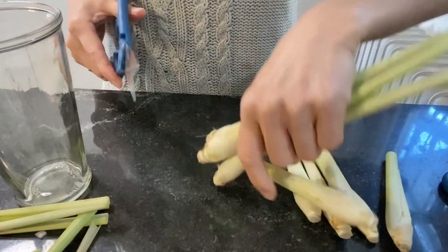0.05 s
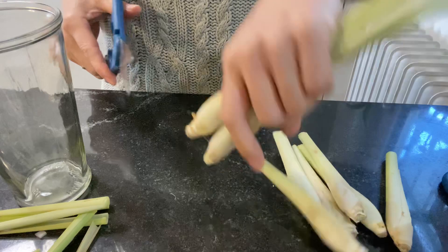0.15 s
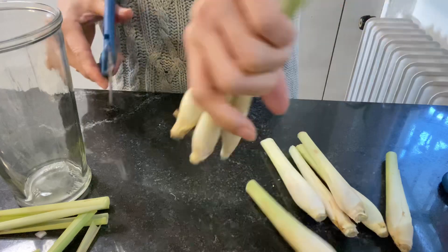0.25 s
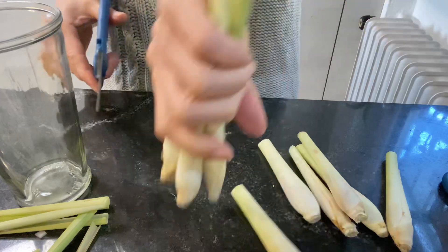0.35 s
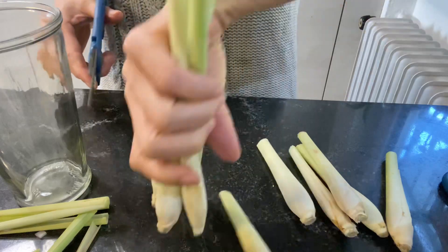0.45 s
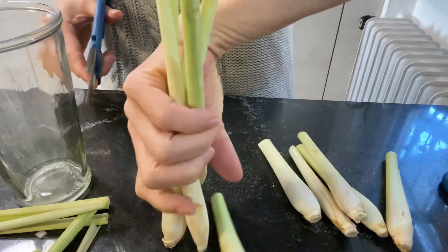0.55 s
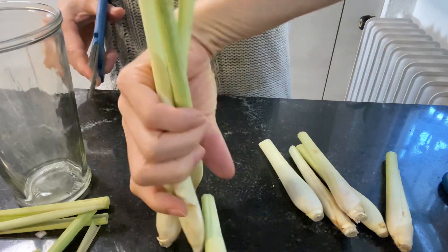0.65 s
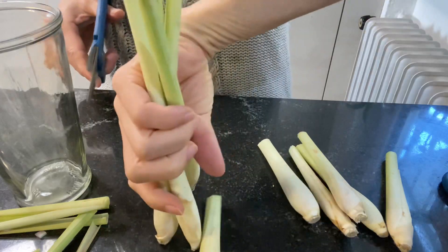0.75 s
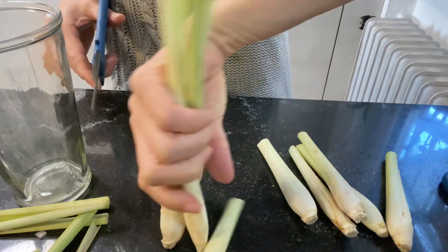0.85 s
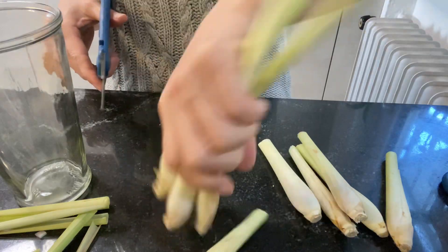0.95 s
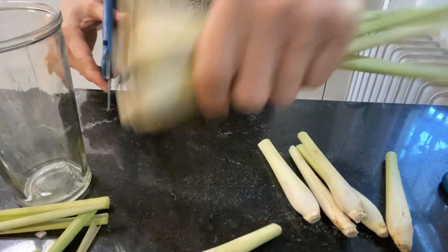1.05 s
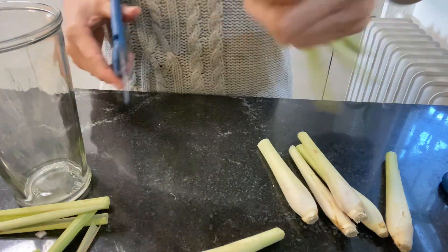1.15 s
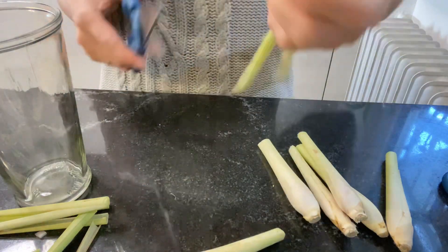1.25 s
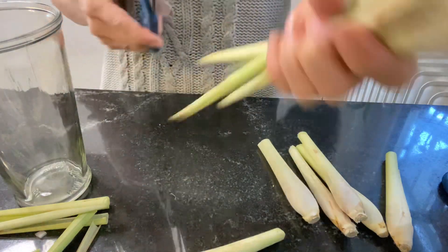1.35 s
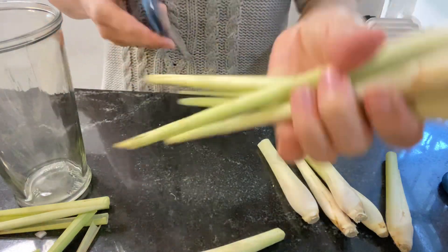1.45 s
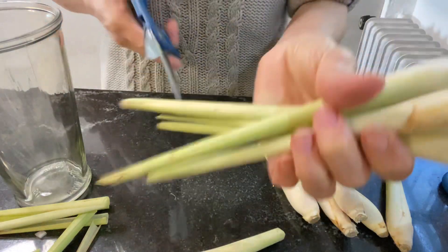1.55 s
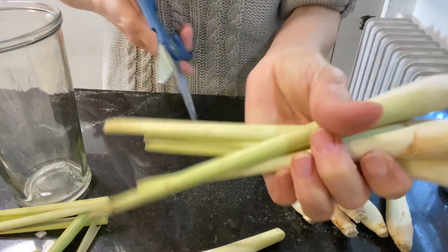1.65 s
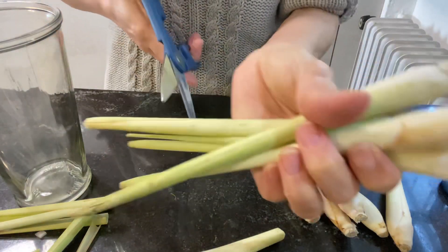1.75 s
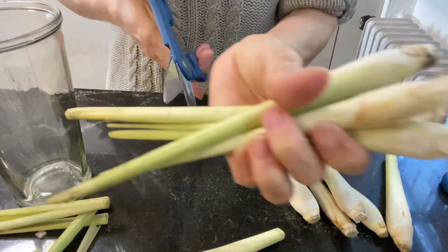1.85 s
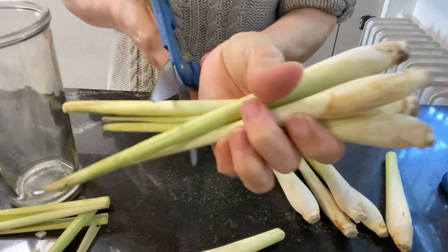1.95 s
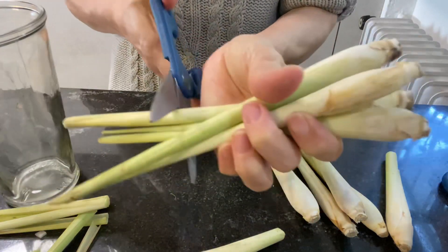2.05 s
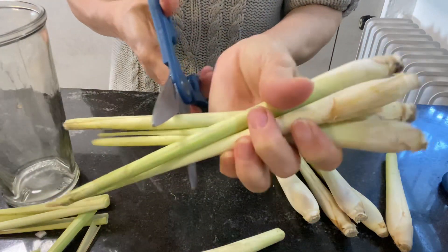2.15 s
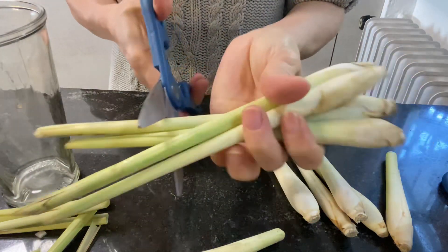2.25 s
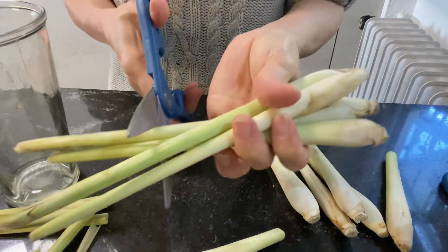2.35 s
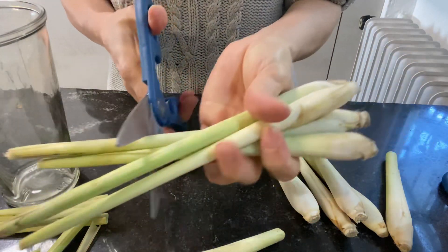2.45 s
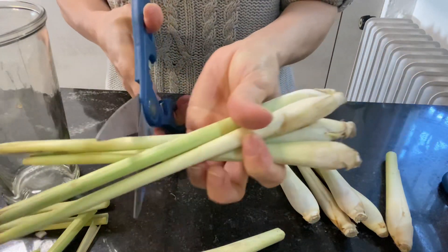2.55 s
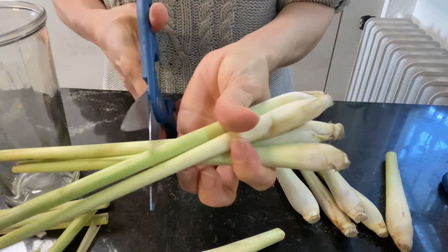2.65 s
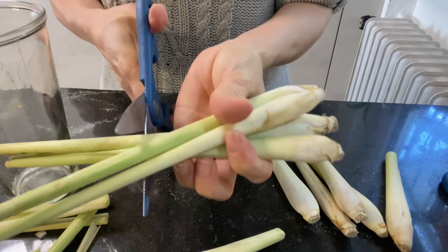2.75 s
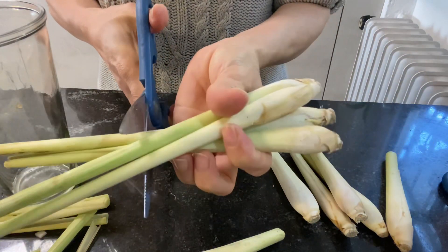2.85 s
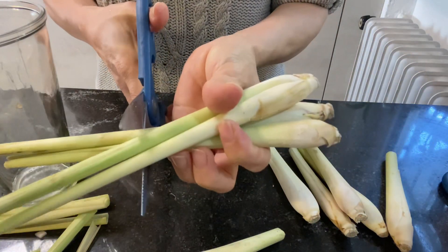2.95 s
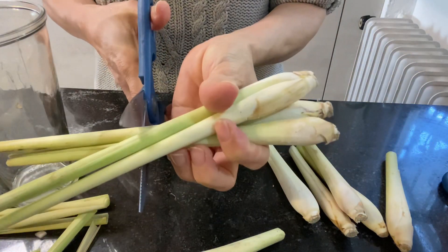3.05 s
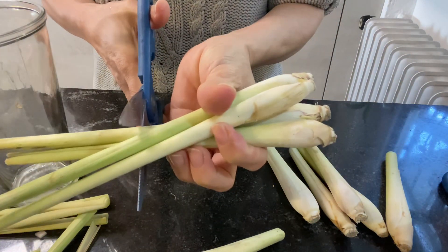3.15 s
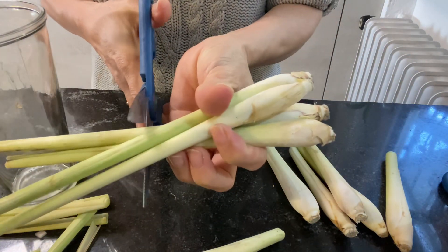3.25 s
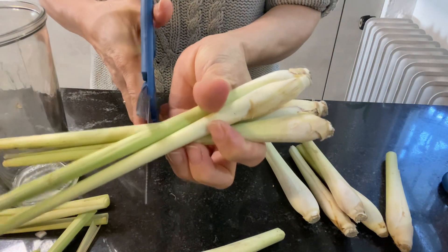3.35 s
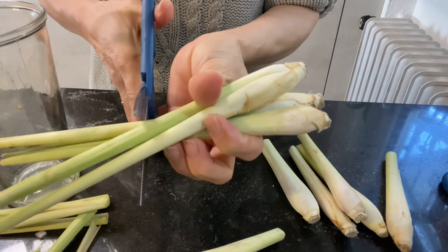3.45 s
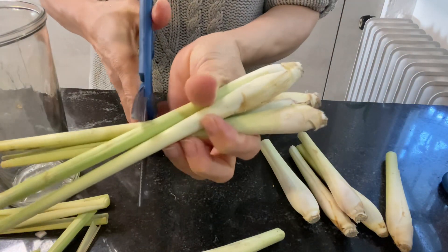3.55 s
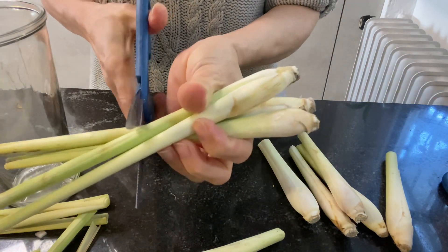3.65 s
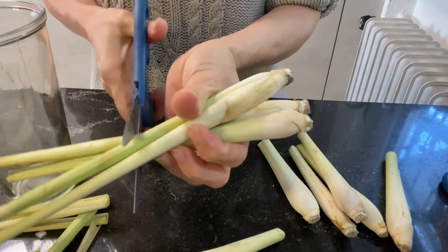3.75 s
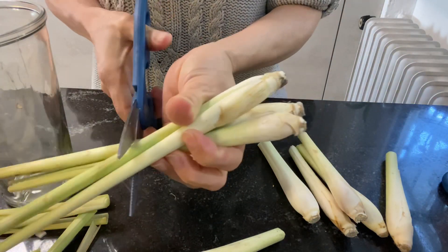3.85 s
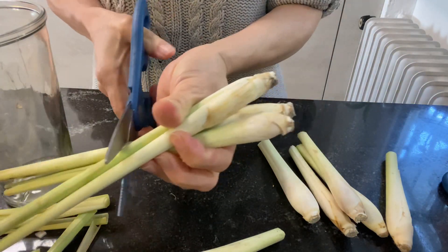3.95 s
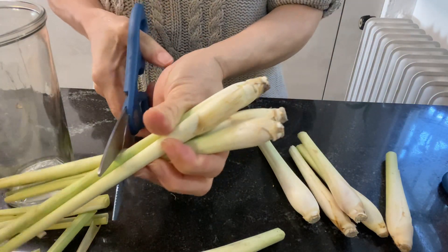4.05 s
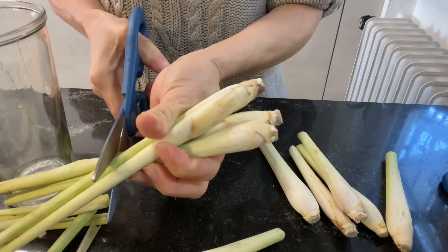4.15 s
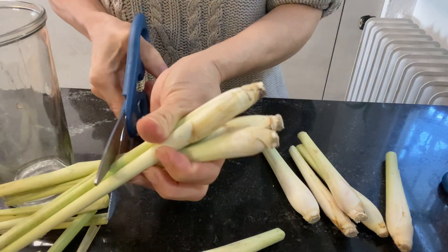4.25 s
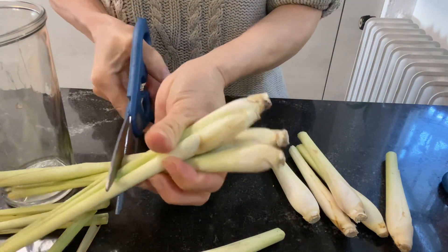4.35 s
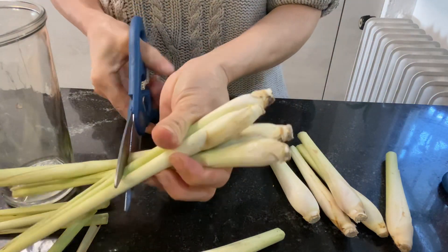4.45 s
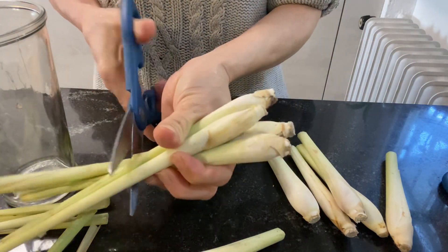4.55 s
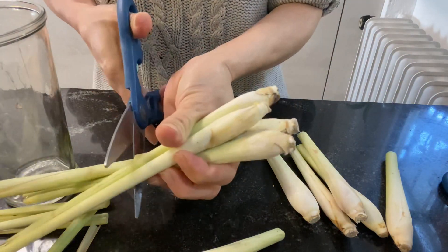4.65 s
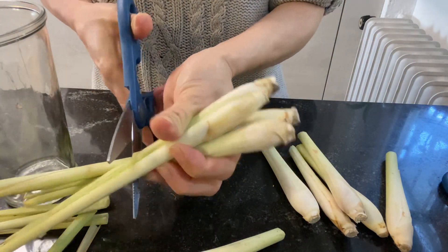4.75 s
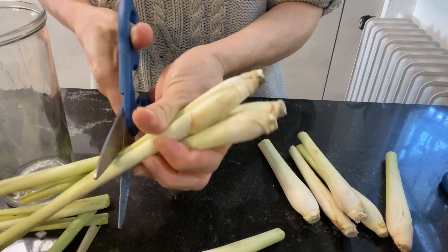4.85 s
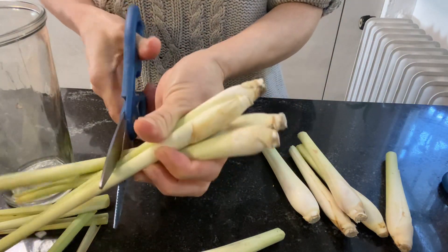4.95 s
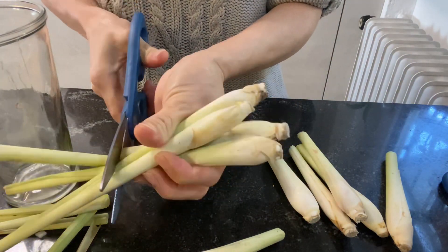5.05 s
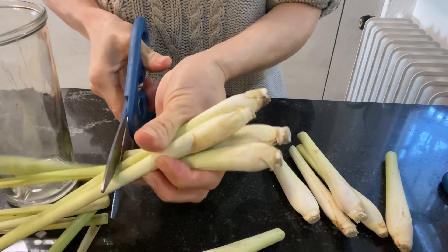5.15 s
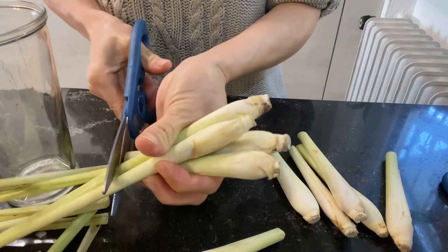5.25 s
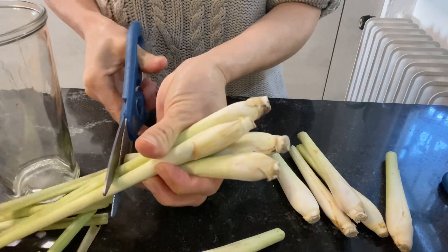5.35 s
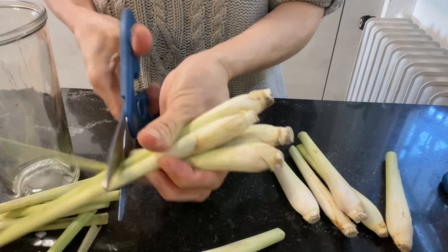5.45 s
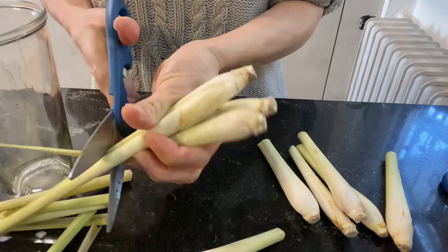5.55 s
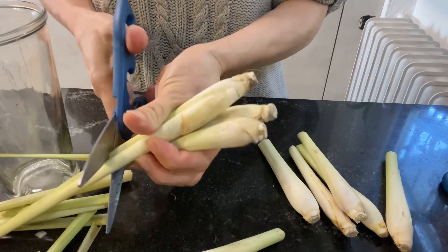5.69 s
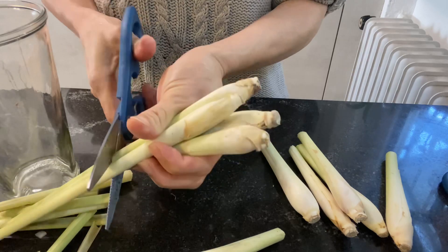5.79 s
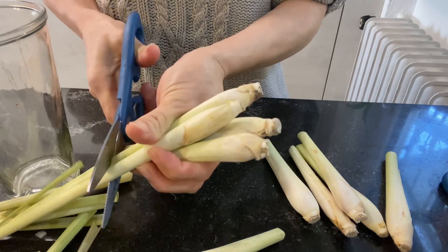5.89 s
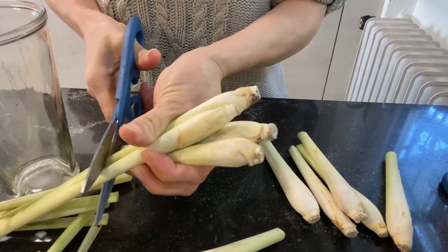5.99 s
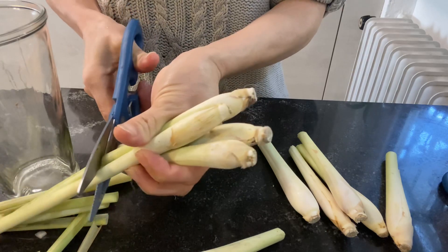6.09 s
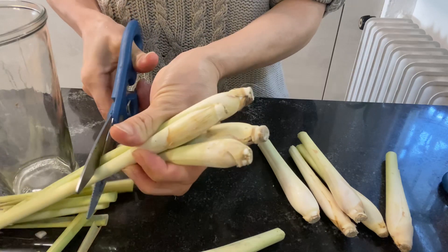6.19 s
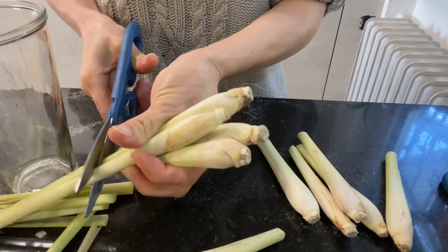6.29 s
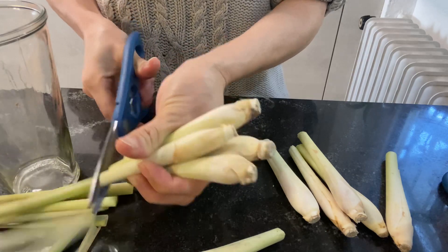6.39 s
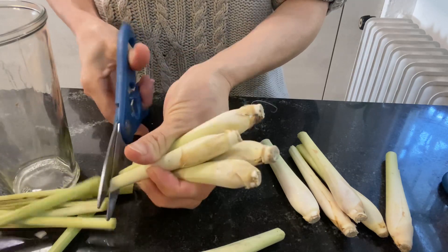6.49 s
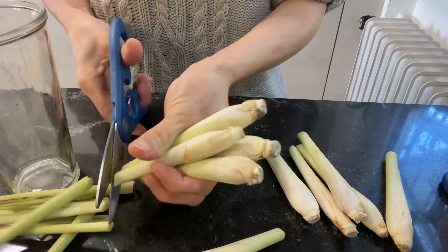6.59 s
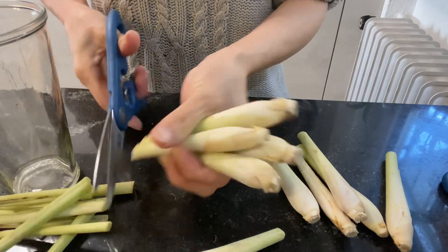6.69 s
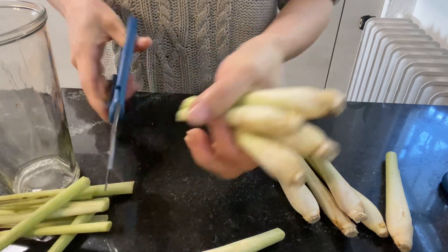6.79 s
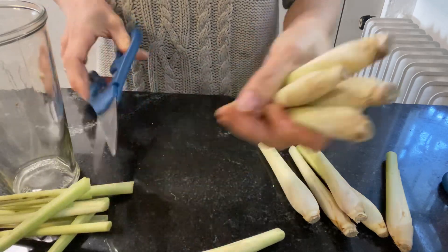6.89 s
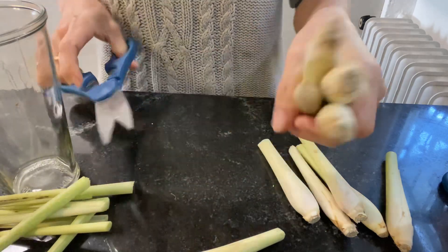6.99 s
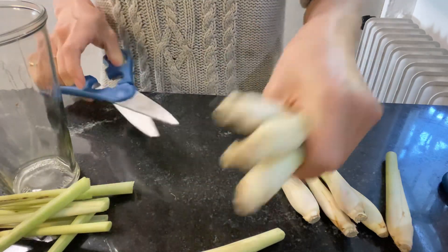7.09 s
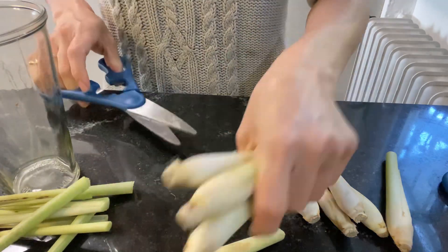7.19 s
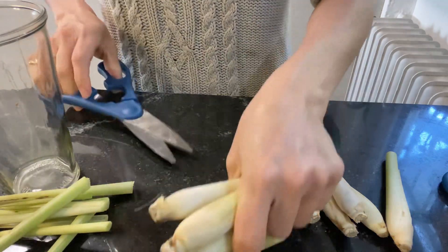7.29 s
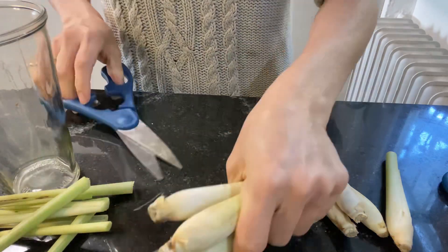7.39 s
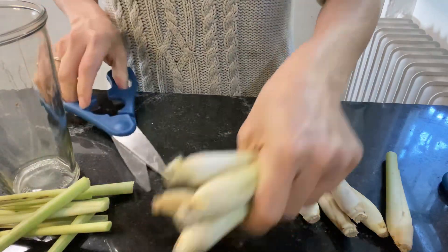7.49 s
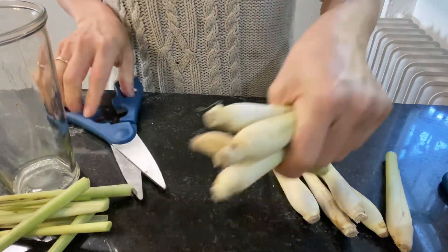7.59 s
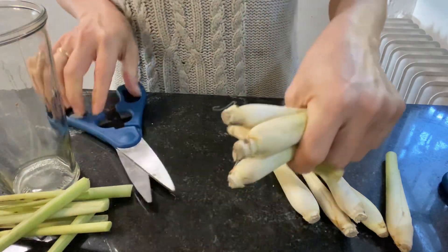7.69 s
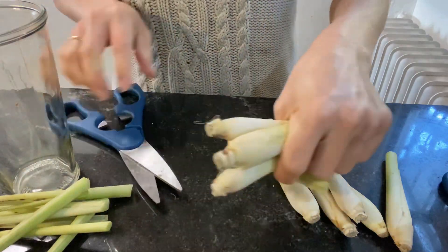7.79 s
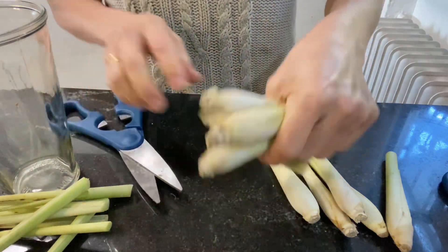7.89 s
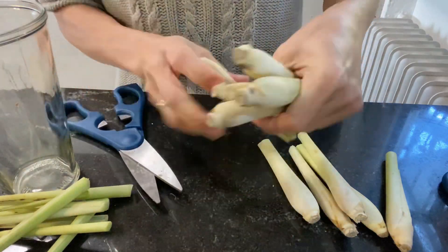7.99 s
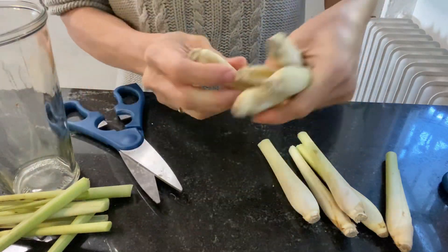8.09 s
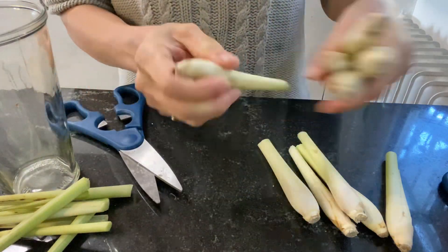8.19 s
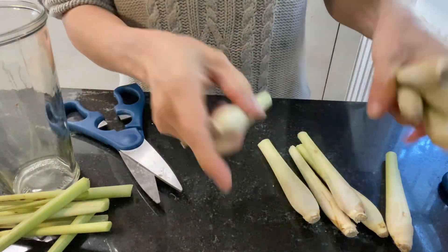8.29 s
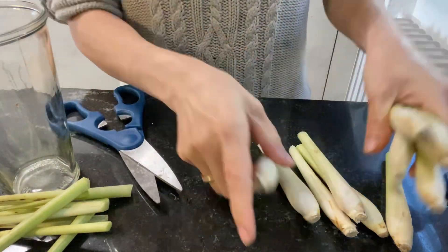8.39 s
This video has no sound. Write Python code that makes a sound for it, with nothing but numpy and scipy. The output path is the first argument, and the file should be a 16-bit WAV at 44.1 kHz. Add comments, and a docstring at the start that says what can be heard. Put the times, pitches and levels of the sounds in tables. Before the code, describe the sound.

A bundle of stalks is knocked level on a stone worktop with dull woody bumps and dry ticks, then briefly rattles against a glass jar. Soft rustling follows, then scissors squeeze through tough fibres in clumped, crackling crunches and bright snaps, cut pieces landing between bites. The blades click and ring as they are laid down, with a last thump and swish. Close stereo microphone, short kitchen echo, low background rumble.

```python
"""Lemongrass stalks are tapped level on a stone counter, then their tips rattle on a glass jar.
Kitchen scissors squeeze through the bundle: clumped grains crunch, torn bursts snap, offcuts drop and ring.
Then scissors and stalks are put down: struck modes thud, click and clink, while husks swish as filtered noise.
The kitchen rings briefly as decaying noise over a low rumble, close to a small stereo microphone."""
import sys
import numpy as np
from scipy import signal
from scipy.fft import rfft, irfft, next_fast_len
from scipy.io import wavfile

SR = 44100
rng = np.random.default_rng(int(sys.argv[2]) if len(sys.argv) > 2 else 0)


def waveform_to_disk(signal):
    """Save audio, clipped to [-1, 1], as 16-bit WAV at the path in sys.argv[1]."""
    frames = np.transpose(np.atleast_2d(signal))
    scaled = np.clip(frames, -1, 1) * 32767
    samples = np.round(scaled).astype(np.int16)
    wavfile.write(sys.argv[1], SR, samples)


N = 371763
TIME = np.arange(N) / SR   # s
LEFT_RIGHT = np.array([[1], [-1]])   # opposite signs for the two sides
# Levels in the tables are relative: the functions that play them may add a mix gain.

# The blades bite into the bundle.
# Each row: start in seconds, length in seconds, crunch at the end in relative dB,
# swell up to then in dB, shudder of the stalks at the end in relative dB.
BITES = [(3.649, 0.44, -39, 14, -61), (4.17, 0.17, -27, 3.5, -39), (4.482, 0.053, -38.5, 10.5, -41.5),
         (4.765, 0.019, -31.5, 7.5, -43), (4.884, 0.064, -40, -4.5, -49.5), (4.992, 0.24, -33, -2, -62),
         (5.231, 0.094, -38.5, 28, -78), (5.443, 0.054, -33, 0, -45), (5.647, 0.33, -34.5, 11, -41.5),
         (6.051, 0.022, -26, 4.5, -30), (6.09, 0.15, -50, -9, -59), (6.289, 0.0015, -29.5, 1, -41),
         (6.325, 0.014, -31.5, 2.5, -30.5), (6.479, 0.067, -52, -7.5, -57)]
# The thickest fibres snap, some at once, some tearing.
# Each row: time in seconds, strength in relative dB, tearing time in seconds.
SNAPS = [(3.6732, -19, 0.0038), (3.8279, -9.5, 0.0017), (3.875, -17, 0.0053), (3.9097, -7.5, 0.0029),
         (3.9168, -9.5, 0.0016), (3.9425, -12.5, 0.0023), (3.9513, -7.5, .003), (4.0106, -9.5, 0.0017),
         (4.0485, -16, 0.0023), (4.0685, -19, 0.0044), (4.0942, -2, 0.0011), (4.0993, 6.5, 0.0026),
         (4.1715, -13.5, 0.0024), (4.2041, -0.5, 0.0044), (4.223, -2, 0.0074), (4.2822, -8.5, .006),
         (4.3255, -7.5, 0.01), (4.881, -19, 0.0034), (4.89, -6, .006), (4.9185, -4.5, 0.00092),
         (4.979, -16, 0.004), (4.992, -4, 0.0046), (5.0121, -11, 0.0034), (5.0212, -11, 0.0042),
         (5.0662, -4, 0.002), (5.0765, -2, 0.0076), (5.1678, -12, 0.0082), (5.265, -15, 0.0079),
         (5.4436, -22, 0.002), (5.7145, -8.5, 0.022), (5.7347, -9.5, .003), (5.7703, -10.5, .005),
         (5.8038, -8.5, 0.0034), (5.8375, -7.5, 0.0065), (5.855, -15, 0.0041), (5.908, -9.5, 0.0042),
         (5.924, -4, 0.011), (5.9517, -16.5, 0.0035), (6.045, 3.5, 0.011), (6.063, -2.5, 0.0019),
         (6.0725, 3, 0.0034), (6.0787, -7, 0.0049), (6.1025, 0, 0.0024), (6.1145, -6, 0.0049),
         (6.1306, -11.5, 0.0024), (6.1428, -5, 0.002), (6.1581, 1.5, 0.0035), (6.1959, -11.5, .002),
         (6.2396, -7, 0.0043), (6.283, 8, 0.006), (6.2904, -2.5, .004), (6.324, 1, 0.0021),
         (6.347, -1, 0.016), (6.3563, -6, 0.0047), (6.363, 8.5, 0.0088)]
# Spectrum of the thin fibres crunching. Each row: frequency in Hz, level in relative dB per Hz.
CRUNCH = [(600, -19), (1500, -10), (2500, -10.5), (4200, -5), (6000, -3), (8500, -1.5), (11500, -5.5),
          (15500, -8)]
# Spectrum of the snaps. Each row: frequency in Hz, level in relative dB per Hz.
SNAP = [(500, -28), (1200, -15.5), (2500, -8.5), (5000, -4), (8500, 2), (11500, -0.5), (15500, -3.5)]
# Modes of the counter, shared by cutting, offcuts, bumps and jar.
# Each row: frequency in Hz, level in relative dB, t60 in seconds.
COUNTER = [(58.8, -9, 0.22), (71, -5.5, 0.11), (121.6, -0.5, 0.15), (166, -15.5, 0.12), (272.8, -11, 0.41)]
BITE_ATTACK_S, BITE_RELEASE_S = 0.029, 0.043   # time to rise or fall by 20 dB
SHUDDER_LAG_S, SHUDDER_RELEASE_S = 0.013, 0.04   # release: time to fall by 20 dB


def cutting():
    """Thin fibres crunch under the blades, thick ones snap; the squeeze shakes the stalks against the counter."""
    bite, shake = 0, 0
    for start, length, crunch_db, swell, shudder_db in BITES:
        bite = bite + stroke(start, length, crunch_db, swell, BITE_ATTACK_S, BITE_RELEASE_S)
        shake = shake + stroke(start + SHUDDER_LAG_S, length, shudder_db, swell,
                               BITE_ATTACK_S, SHUDDER_RELEASE_S)
    s, strength_db, tear_s = np.vstack([SNAPS, lesser_snaps(bite)]).T

    crunch = bite * grains(per_s=750, spread_db=3.0, clump_db=3.0, hiss=.08)
    crunch = fibres(colour(crunch, CRUNCH), per_s=140, own_db=4.6, sway_db=2.0, count=16)
    snaps = colour(snapping(s, strength_db, tear_s), SNAP)

    # each snap also cracks the woody core of the stalk, and the jolt reaches the counter
    jolts = blows(s, strength_db, scatter=0.86, t60=0.017, size=1024)
    core = band(jolts, 840, 3500)
    thud = ring(band(jolts, 68, 220), COUNTER)

    shudder = band(rng.standard_normal(N), 29, 130) * from_db(3.2 * drift(40))
    shudder = shake * shudder / shudder.std()
    return (from_db(-9.0) * crunch + from_db(-1.5) * snaps + from_db(-13.5) * core
            + from_db(-44.0) * thud + from_db(-4.5) * shudder)


LESSER_PER_S = 32   # candidates per second, before the weakest moments are silenced
LESSER_TEAR_S = 0.007
# strength at the usual crunch, random spread, and dB of strength per dB of crunch
LESSER_DB, LESSER_SPREAD_DB, LESSER_FOLLOWS = -15.5, 2, 1
USUAL_CRUNCH_DB, WEAKEST_CRUNCH_DB = -38, -52   # bite gain before the mix


def lesser_snaps(bite):
    """Lesser fibres give way at random under the bite, harder as the crunch grows: rows as in SNAPS."""
    count = int(LESSER_PER_S * N / SR)
    at = (np.arange(count) + rng.random(count)) / count * (N - 1)   # one in each equal slot
    at = at.astype(int)
    crunch_db = 20 * np.log10(bite[at])
    db = LESSER_DB + LESSER_FOLLOWS * (crunch_db - USUAL_CRUNCH_DB)
    db = db + LESSER_SPREAD_DB * rng.standard_normal(count)
    db = np.where(crunch_db > WEAKEST_CRUNCH_DB, db, -np.inf)
    return np.column_stack([at / SR, db, np.full(count, LESSER_TEAR_S)])


STRANDS_PER_S, STRAND_SHARE = 2200, 2.4   # strands round each snap; their strength against the snap itself
FIBRE_LOW_HZ, FIBRE_HIGH_HZ, FIBRE_Q, FIBRE_RING = 1200, 16000, 4, 1.9   # ring: gain of each resonance
FIBRE_LAG_S, FIBRE_SIDE_DB = 8e-6, 5   # random spread of the delay between sides and of each side's level


def snapping(times, levels_db, tear_s, size=2048):
    """Strands part around each snap; every fibre rings at two pitches of its own and has its own place."""
    shape = (len(times), size)
    hz = np.fft.rfftfreq(size, 1 / SR) + 1
    middle = size // 2

    fade = from_db(-30 * np.abs(TIME[:size] - TIME[middle]) / tear_s[:, None])
    friction = rng.standard_normal(shape)
    parting = rng.random(shape) < STRANDS_PER_S / SR
    strands = friction * (.15 + parting) * fade
    force = STRAND_SHARE * strands / np.linalg.norm(strands, axis=1, keepdims=True)
    force[:, middle] += 1   # the snap itself

    pitch = FIBRE_LOW_HZ * (FIBRE_HIGH_HZ / FIBRE_LOW_HZ) ** rng.random((len(times), 2, 1, 1))
    radiated = FIBRE_RING * from_db(FIBRE_SIDE_DB * rng.standard_normal(pitch.shape) * LEFT_RIGHT)
    resonances = radiated / (1 + 1j * FIBRE_Q * (hz / pitch - pitch / hz))
    spectra = rfft(force)[:, None] * (1 + resonances.sum(axis=1))

    lags = rng.normal(0, FIBRE_LAG_S, len(times))
    out = np.zeros((2, N + 2 * size))
    for s, db, spectrum, lag in zip(times, levels_db, spectra, lags):
        snap = irfft(spectrum * np.exp(1j * np.pi * hz * lag * LEFT_RIGHT))
        start = int(np.clip(s * SR, 0, N))
        out[:, start:start + size] += from_db(db) * snap / np.linalg.norm(snap, axis=1).mean()
    return out[:, middle:middle + N]


# Offcuts drop on the counter.
# Each row: time in seconds, thud in relative dB, crack in relative dB, contact hardness in Hz,
# pitch of the piece in Hz.
DROPS = [(4.37, -30.5, -11, 1090, 1140), (4.803, -33.5, -17, 1630, 1420), (5.163, -43, -14.5, 990, 780),
         (5.441, -33, -8.5, 4040, 1640), (5.649, -34.5, -23, 1780, 1430), (6.427, -30, -6.5, 965, 693)]
# Crack of an offcut. Each row: frequency in Hz, level in relative dB per Hz.
CRACK = [(80, -7), (280, 9.5), (450, -2), (750, -6.5), (1200, 0.5), (1700, -3.5), (2050, -7.5),
         (5000, -7.5), (15000, -37)]
# Modes of an offcut. Each row: multiple of its pitch, level in relative dB, t60 in seconds.
OFFCUT = [(.83, -34.5, 0.024), (1.002, -43.5, 0.1), (1.41, -50, .05)]


def offcuts():
    """Each cut piece lands with a crack, rings briefly at its own pitch and makes the counter boom."""
    s, thud_db, crack_db, hardness_hz, _ = np.transpose(DROPS)
    thud = ring(band(blows(s, thud_db, scatter=0.067, t60=0.029), 34, 170), COUNTER)
    crack = colour(blows(s, crack_db, scatter=0.84, t60=0.042, top_hz=hardness_hz), CRACK)
    pieces = 0
    for start, _, db, hardness, pitch in DROPS:
        modes = [(multiple * pitch, level, t60) for multiple, level, t60 in OFFCUT]
        pieces = pieces + ring(blows([start], [db], scatter=0.25, t60=0.012, top_hz=hardness), modes)
    return bend(thud + crack + pieces)


BEND_LAG_S, BEND_HZ = 0.0098, 122   # bending waves of this frequency arrive so much later


def bend(x):
    """Bending waves run slower at low frequencies, so a blow sweeps downwards."""
    size = next_fast_len(N + SR)
    hz = np.fft.rfftfreq(size, 1 / SR)
    phase = -4 * np.pi * BEND_LAG_S * np.sqrt(BEND_HZ * hz)   # delay falls as 1 / sqrt(hz)
    return irfft(rfft(x, size) * np.exp(1j * phase), size)[..., :N]


# Husks brush on skin and on each other.
# Each row: start in seconds, length in seconds, level in relative dB.
BRUSHES = [(0.224, 0.06, -56.5), (0.512, 0.04, -53), (0.586, 0.23, -71.5), (1.178, 0.2, -75),
           (1.354, 0.061, -59.5), (1.49, 0.077, -57.5), (1.969, 0.028, -50.5), (2.122, 0.16, -55.5),
           (2.453, 0.38, -63), (3.183, 0.038, -61.5), (3.355, 0.071, -63), (6.65, 0.076, -56),
           (6.776, 0.13, -64), (7.039, 0.05, -61.5), (7.28, 0.038, -65.5), (7.419, 0.034, -58),
           (7.539, 0.02, -49.5), (7.592, 0.1, -45.5), (8.028, 0.077, -58.5), (8.387, 0.025, -56)]
# Sharp ticks of husk ends and scissors as they touch something.
# Each row: time in seconds, strength in relative dB, pitch in Hz.
TICKS = [(.19, -29, 9100), (.227, -19, 6850), (.27, -24.5, 4800), (.521, -24, 5600), (1.4947, -28.5, 6500),
         (2.143, -25.5, 8200), (2.4114, -16.5, 8100), (2.929, -39.5, 2470), (3.074, -38.5, 8100),
         (6.6618, -18.5, 7450)]
# Spectrum of the husks. Each row: frequency in Hz, level in relative dB per Hz.
HUSK = [(700, -15.5), (2000, -11), (4300, -2), (6200, -3.5), (8500, 0.5), (11000, -9), (15500, -7)]
BRUSH_ATTACK_S, BRUSH_RELEASE_S = 0.0037, 0.017   # time to rise or fall by 20 dB
GRIP_DB = -81   # the faint rub of simply holding the bundle, before the mix
TICK_Q = 3.5


def handling():
    """Dry husks swish and tick as the bundle is moved, and the hands rumble faintly with it."""
    rubbing = from_db(GRIP_DB)
    for start, length, db in BRUSHES:
        rubbing = rubbing + stroke(start, length, db, 0, BRUSH_ATTACK_S, BRUSH_RELEASE_S)
    husks = colour(rubbing * grains(per_s=2100, spread_db=3.5, clump_db=5.5, hiss=0.99), HUSK)
    husks = fibres(husks, per_s=12, own_db=2.6, sway_db=1.5, count=8)

    ticks = 0
    for s, db, hz in TICKS:
        touch = blows([s], [db], scatter=0.5, t60=0.003) + 1e-18   # inaudible offset
        ticks = ticks + signal.lfilter(*signal.iirpeak(hz, TICK_Q, fs=SR), touch)

    hands = rubbing * band(rng.standard_normal(N), 32, 100)
    return from_db(-4.0) * husks + from_db(9.5) * ticks + from_db(19.5) * hands


# Stalks and scissors bump the counter.
# Each row: time in seconds, thud in relative dB, knock in relative dB, contact hardness in Hz.
BUMPS = [(.045, -42.5, -64, 490), (0.192, -36.5, -41.5, 1230), (.227, -36.5, -40, 2130),
         (.267, -32.5, -46.5, 800), (.518, -28.5, -36, 1310), (.527, -18, -29, 1700),
         (1.498, -56, -50, 2900), (2.646, -38.5, -55.5, 1870), (3.774, -41, -60, 1990),
         (6.658, -54, -51.5, 1200), (6.825, -55.5, -50.5, 680), (7.27, -45, -53.5, 397),
         (7.328, -33, -46.5, 430), (7.558, -25.5, -33, 1330), (7.603, -27.5, -36, 2400),
         (7.619, -24, -32.5, 2400), (7.668, -54, -37, 2000), (7.74, -46.5, -46.5, 1090)]
# Spectrum of the knock. Each row: frequency in Hz, level in relative dB per Hz.
KNOCK = [(80, -13), (280, 5.5), (380, 3), (500, 2), (660, 1), (820, -2.5), (1020, 6.5), (1300, -7),
         (1680, -7.5), (2500, 1), (6000, -13.5)]
# Modes of the woody stalks. Each row: frequency in Hz, level in relative dB, t60 in seconds.
STALK = [(272.3, 5, 0.11), (371.7, -1.5, .07), (614, -6, 0.088), (672, -15, .07), (954, -8, 0.1),
         (1016, -3.5, 0.11), (1645, -3, 0.017)]
WOODY_WANDER_S, WOODY_WANDER_PER_S = .0005, 40   # spread of the time shift; turning points per second


def bumps():
    """Each bump knocks in the woody stalk, and a moment later its weight booms in the counter."""
    s, thud_db, knock_db, hardness_hz = np.transpose(BUMPS)
    thud = ring(band(blows(s + .004, thud_db, scatter=0, t60=1), 59, 220), COUNTER)
    clatter = blows(s, knock_db, scatter=1.3, t60=0.072, top_hz=hardness_hz, order=4)
    clatter = colour(clatter, KNOCK)
    woody = ring(blows(s, knock_db, scatter=0.46, t60=0.0053, top_hz=hardness_hz, order=4), STALK)
    # a random time wander detunes and blurs the woody ring
    woody = np.interp(TIME + WOODY_WANDER_S * drift(WOODY_WANDER_PER_S), TIME, woody[0])
    return thud + from_db(24.5) * clatter + from_db(-1.5) * woody


# Stalk tips strike the glass jar and rattle. Each row: time in seconds, level in relative dB.
JAR_TAPS = [(1.871, -26), (1.879, -24.5), (1.894, -27.5), (1.918, -24), (1.93, -25.5), (1.963, -29.5),
            (1.995, -40.5), (2.029, -40), (2.085, -41.5)]
# The jar rocks on its base. Each row: time in seconds, level in relative dB.
JAR_ROCKS = [(1.874, -51), (1.922, -53), (2.058, -53.5), (2.158, -54)]
# Hollow clatter of the stalks on the jar. Each row: frequency in Hz, level in relative dB per Hz.
HOLLOW = [(200, -11.5), (550, -18), (800, -6.5), (1050, 4), (1220, 3.5), (1450, -18), (1650, -6.5),
          (2000, -18), (2350, -14), (3000, -33.5), (4700, -36), (12000, -73)]
# Modes of the jar's wall. Each row: frequency in Hz, level in relative dB, t60 in seconds.
JAR = [(621, -11, 0.46), (1020, -4.5, 0.12), (1111, -5.5, 0.11), (4600, -20.5, 0.19)]
# Modes of the jar's base. Each row: frequency in Hz, level in relative dB, t60 in seconds.
JAR_BASE = [(329.4, 1.2, 0.18), (363, 1.3, .3)]


def jar():
    """The stalk tips clatter hollowly on the glass, and the jar hums as it rocks on the counter."""
    taps = blows(*np.transpose(JAR_TAPS), scatter=2.4, t60=0.064)
    rocking = ring(blows(*np.transpose(JAR_ROCKS), scatter=0, t60=1), JAR_BASE + COUNTER)
    return from_db(16.5) * colour(taps, HOLLOW) + from_db(-12.0) * ring(taps, JAR) + rocking


# The scissors clink on the counter.
# Each row: time in seconds, blades in relative dB, handles in relative dB,
# contact hardness of the blades in Hz.
CLINKS = [(7.3243, -5, -66, 18000), (7.35, -10, -83, 18000), (7.6002, 3.5, -39.5, 9500),
          (7.615, -3, -34.5, 8500), (7.668, -9.5, -46, 7500)]
# Click of the blades on stone. Each row: frequency in Hz, level in relative dB per Hz.
BLADE = [(300, -15.5), (1400, -22), (2100, -15), (3100, -15), (4200, -2.5), (5800, -7.5), (8000, 2),
         (10500, -2.5), (13300, 4.5), (15500, -12)]
# Modes of the steel blades. Each row: frequency in Hz, level in relative dB, t60 in seconds.
STEEL = [(2060, -3, 0.13), (2360, -9, 0.13), (4050, -4.5, 0.24), (4261, -2.5, 0.17), (8370, 2, 0.092)]
# Modes of the scissor handles. Each row: frequency in Hz, level in relative dB, t60 in seconds.
HANDLE = [(700, 3, 0.056), (1610, -3, .05), (1680, 0, 0.066), (2360, -14, 0.071)]


def scissors():
    """Laid down and nudged, the blades click and ring on the stone while the handles rattle."""
    s, click_db, handle_db, hardness_hz = np.transpose(CLINKS)
    clicks = blows(s, click_db, scatter=1.1, t60=.007, top_hz=hardness_hz)
    handles = ring(blows(s, handle_db, scatter=0.96, t60=0.086), HANDLE)
    return colour(clicks, BLADE) + from_db(-52.5) * ring(clicks, STEEL) + handles


# Decay of the kitchen. Each row: frequency in Hz, t60 in seconds.
ROOM_T60 = [(100, .45), (700, .34), (4500, .4), (9000, .33), (15000, .24)]
# Strength of the kitchen's tail. Each row: frequency in Hz, echo level in relative dB.
ROOM_DB = [(100, -4.5), (400, -5), (1000, -7.5), (4300, -10), (8500, -11), (15000, -9)]


def kitchen(x):
    """Quick echoes from counter and hands, with a tail that dies band by band."""
    edges, tail = np.geomspace(40, 19000, 10), 0
    for low, high in zip(edges, edges[1:]):
        centre = np.sqrt(low * high)
        echoes = dying_noise(at_hz(ROOM_T60, centre), size=SR // 2)
        tail = tail + band(echoes, low, high) * from_db(at_hz(ROOM_DB, centre))
    near = from_db(-6.0) * band(dying_noise(0.065, size=4096), 420, 22000)
    return convolve(x, tail) + convolve(x, near)


# Spectrum of the rumble. Each row: frequency in Hz, level in relative dB per Hz.
RUMBLE = [(20, -5), (55, 4), (120, -2), (270, -6), (450, -25.5), (1400, -29.5), (4000, -34.5),
          (8500, -42.5)]
RUMBLE_WAVER_DB, RUMBLE_WAVER_PER_S = 3.5, 11   # spread; turning points per second


def rumble():
    """Bass-heavy noise whose level wavers at random."""
    noise = colour(rng.standard_normal((2, N)), RUMBLE)
    return from_db(-64.5) * noise * from_db(RUMBLE_WAVER_DB * drift(RUMBLE_WAVER_PER_S))


def stroke(start, length, end_db, swell_db, attack_s, release_s):
    """Gain of one movement of the hand: it sets in, swells steadily in dB and lets go."""
    progress = np.clip((TIME - start) / max(length, 1 / SR), 0, 1)
    before = np.maximum(start - TIME, 0) / attack_s
    after = np.maximum(TIME - start - length, 0) / release_s
    return from_db(end_db + swell_db * (progress - 1) - 20 * np.minimum(before + after, 10))


def grains(per_s, spread_db, clump_db, hiss):
    """Tiny breaks of uneven size that come in clumps, over a friction hiss; power about 1."""
    sizes = from_db(spread_db * np.minimum(rng.exponential(1, N), 4)) * rng.choice([-1, 1], N)
    clicks = sizes * (rng.random(N) < per_s / SR)
    x = clicks / clicks.std() + hiss * rng.standard_normal(N)
    x = x * from_db(clump_db * drift(250))
    return x / x.std()


def fibres(x, per_s, own_db, sway_db, count=12):
    """Each fibre has a colour and a place of its own: bands rise, fall and sway between the sides."""
    out, below = 0, 0
    for edge in np.geomspace(700, 18000, count):
        upto = signal.sosfiltfilt(signal.butter(4, edge, fs=SR, output="sos"), x)
        gain_db = own_db * drift(per_s) + sway_db * drift(per_s) * LEFT_RIGHT
        out = out + (upto - below) * from_db(gain_db)
        below = upto
    return out


def blows(times, levels_db, scatter, t60, top_hz=19000, size=4096, order=2):
    """One impulse an event with a short scatter of smaller contacts; a soft contact has less treble."""
    out = np.zeros(N + size)
    bursts = scatter * dying_noise(t60, size, count=len(times))
    tops = np.broadcast_to(top_hz, len(times))
    for s, db, top, burst in zip(times, levels_db, tops, bursts):
        burst[0] += 1
        start = int(np.clip(s * SR, 0, N))
        soft = signal.butter(order, min(top, .45 * SR), fs=SR)
        out[start:start + size] += from_db(db) * signal.lfilter(*soft, burst / np.linalg.norm(burst))
    return out[:N]


def ring(force, modes):
    """Damped modes set ringing by the force."""
    t = TIME[:SR]
    response = sum(from_db(db - 60 * t / t60) * np.cos(2 * np.pi * hz * t) for hz, db, t60 in modes)
    return convolve(force, response)


def dying_noise(t60, size, count=2):
    """Rows of decaying noise, each of unit energy."""
    burst = rng.standard_normal((count, size)) * from_db(-60 * TIME[:size] / t60)
    return burst / np.linalg.norm(burst, axis=1, keepdims=True)


def colour(x, spectrum, size=4096):
    """Causal (minimum-phase) filter with this spectrum; white noise keeps its power."""
    cepstrum = irfft(np.log(from_db(at_hz(spectrum, np.fft.rfftfreq(size, 1 / SR)))))
    cepstrum[1:size // 2] *= 2   # fold onto positive times
    cepstrum[size // 2 + 1:] = 0
    response = irfft(np.exp(rfft(cepstrum)))
    return convolve(x, response / np.linalg.norm(response))


def band(x, low_hz, high_hz):
    """Butterworth band-pass."""
    sos = signal.butter(2, [low_hz, min(high_hz, .45 * SR)], "band", fs=SR, output="sos")
    return signal.sosfilt(sos, x)


def convolve(x, response):
    """Pass x through an impulse response."""
    return signal.oaconvolve(np.atleast_2d(x), np.atleast_2d(response), axes=-1)[:, :N]


def drift(per_s):
    """Random curve with per_s turning points a second, of spread near 1."""
    return np.interp(TIME * per_s, np.arange(N), rng.standard_normal(N))


def at_hz(points, hz):
    """Read a table on a log-frequency axis."""
    f, value = np.transpose(points)
    return np.interp(np.log(np.maximum(hz, 1)), np.log(f), value)


def from_db(db):
    """Decibels to gain."""
    return 10 ** (np.asarray(db) / 20)


def scene():
    """Direct sound reaches both sides; its middle range bends round the hands and echoes differently to each."""
    dry = cutting() + offcuts() + handling() + bumps() + jar() + scissors()
    source = dry.mean(axis=0)
    background = rumble()
    common, apart = kitchen(source) + background
    bent = band(convolve(source, dying_noise(0.0014, size=512, count=1)), 1100, 2800)
    side = band(apart, 210, 5700) + from_db(-18) * apart + from_db(-2.5) * bent
    return dry + common + side * LEFT_RIGHT


# Phase between the microphone's two ports. Each row: frequency in Hz, lead of the left in radians.
PORT_PHASE = [(3000, 0), (6000, -1.7), (8000, .1), (9000, 1.1), (11300, 3.7), (12500, 6.1), (13500, 6.5),
              (15000, 9.2)]
# Level between the two ports. Each row: frequency in Hz, left minus right in dB.
BALANCE = [(200, -5), (700, -2.5), (1100, -1.5), (1600, -0.5), (5500, -2), (9000, 0)]
CUTOFF_HZ = 15800
CEILING = .9   # peaks round off towards this amplitude


def record(dry):
    """The two ports differ in phase and level; deep bass is cut, peaks are rounded and the top is cut."""
    size = next_fast_len(N + 4096)
    hz = np.fft.rfftfreq(size, 1 / SR)
    # half of each difference goes to either side
    left = from_db(at_hz(BALANCE, hz) / 2) * np.exp(.5j * at_hz(PORT_PHASE, hz))
    heard = irfft(rfft(dry, size) * np.array([left, 1 / left]), size)[:, :N]
    heard = signal.sosfilt(signal.butter(4, 44, "high", fs=SR, output="sos"), heard)
    rounded = CEILING * np.tanh(heard / CEILING)
    return signal.sosfilt(signal.ellip(10, .2, 80, CUTOFF_HZ, fs=SR, output="sos"), rounded)


dry = scene()
out = record(dry)
waveform_to_disk(out)
```